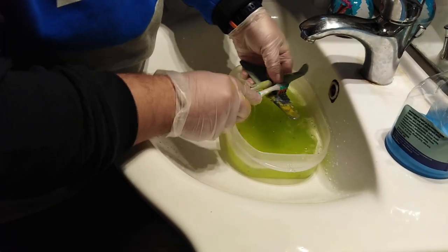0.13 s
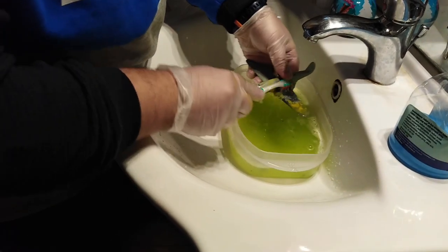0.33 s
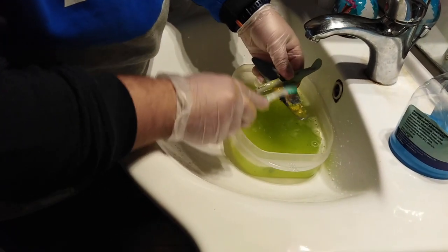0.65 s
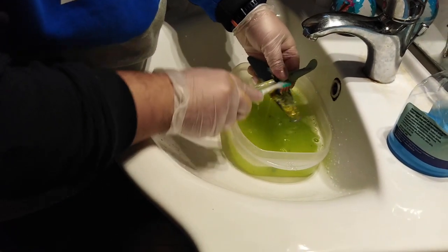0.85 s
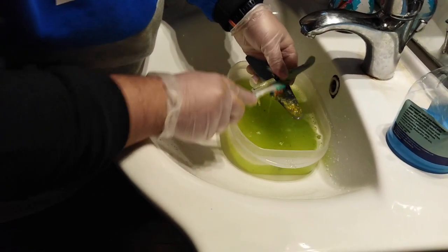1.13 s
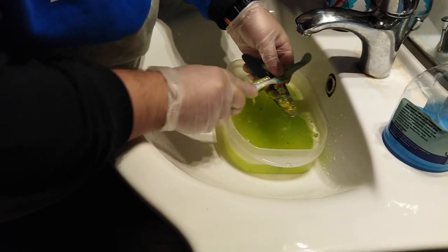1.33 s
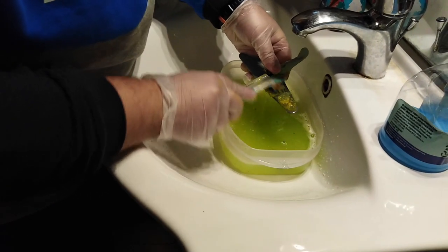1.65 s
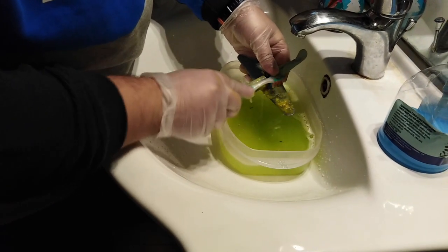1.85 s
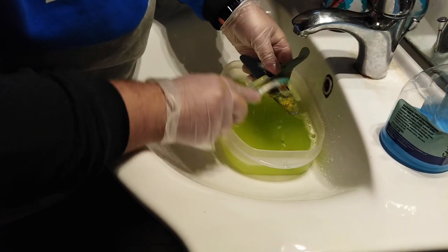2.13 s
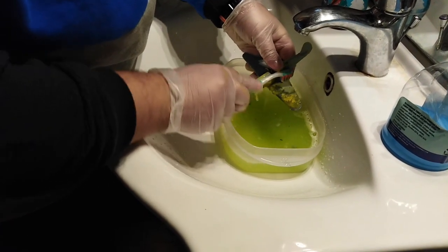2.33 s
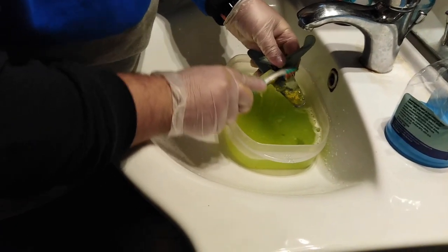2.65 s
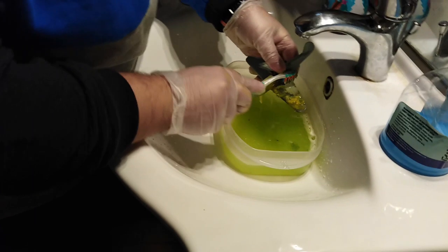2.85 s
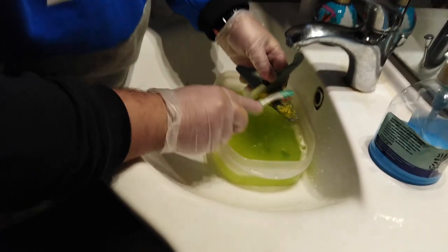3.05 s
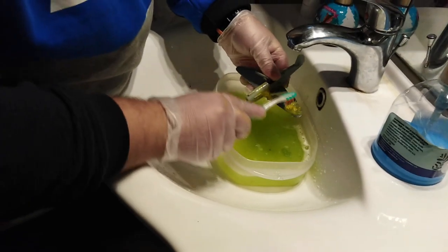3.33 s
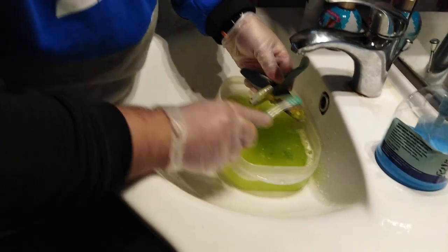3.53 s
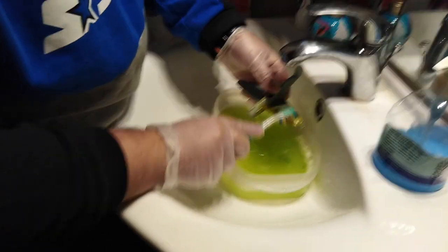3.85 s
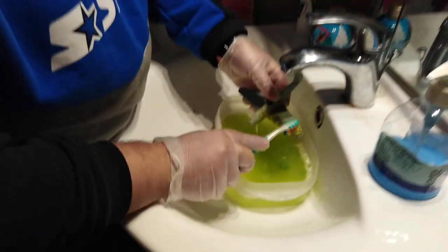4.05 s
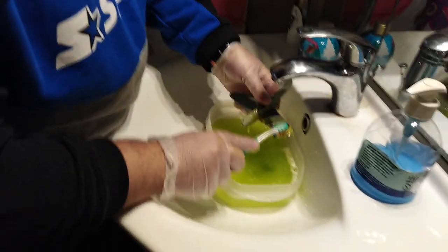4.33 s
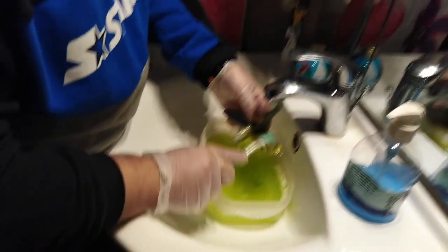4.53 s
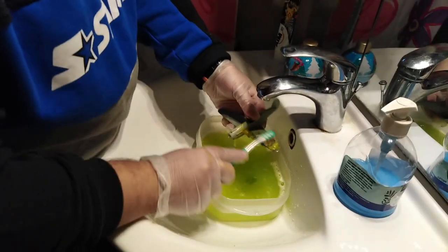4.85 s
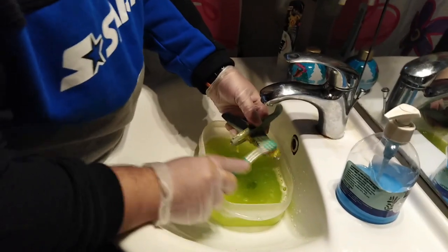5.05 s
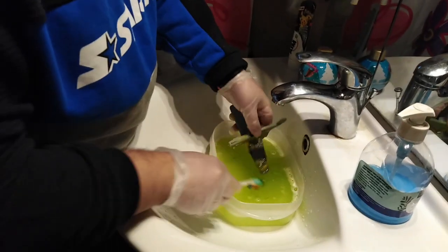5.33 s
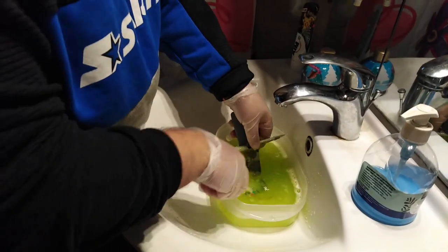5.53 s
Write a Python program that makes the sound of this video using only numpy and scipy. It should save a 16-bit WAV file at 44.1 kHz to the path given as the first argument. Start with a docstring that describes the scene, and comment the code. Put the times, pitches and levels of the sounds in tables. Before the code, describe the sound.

An old toothbrush scrubs a hard plastic part with quick, raspy back-and-forth strokes close up, then lifts away before a few scuffs and bumps.

```python
"""Toothbrush on a plastic part

At a sink, close to two microphones, a toothbrush scrubs a plastic part held over a plastic bowl.
The strokes are shaped noise of slipping bristle tips, coloured by the rings of the part.
Cracks ring the part, bumps ring the bowl, a glove groans as sine tones and a thin whistle glides down.
The brush lifts off and the part scuffs as it is put down; sparse echoes and a faint room surround it all."""
import sys
import numpy as np
from scipy import signal
from scipy.fft import rfft, irfft
from scipy.io import wavfile
from scipy.ndimage import uniform_filter1d

SR = 44100
rng = np.random.default_rng(int(sys.argv[2]) if len(sys.argv) > 2 else 0)


def materialize(psi):
    """Save the field psi as 16-bit PCM at rate SR to the path in sys.argv[1].

    A 1-D psi becomes a single channel; in a 2-D psi each row is a channel.
    """
    bounded = np.clip(np.atleast_2d(psi).T, -1, 1)
    quanta = np.round(bounded * 32767).astype(np.int16)
    wavfile.write(sys.argv[1], SR, quanta)


N = 251370


def gain_of(db):
    """Amplitude factor of a level in dB."""
    return 10 ** (np.asarray(db) / 20)


def evened(x):
    """Scale to an rms of 1."""
    return x / np.sqrt(np.mean(x ** 2) + 1e-20)


def read(points, hz):
    """Read a curve of (Hz, value) points on a logarithmic frequency axis."""
    f, value = np.transpose(points)
    return np.interp(np.log(hz + 1), np.log(f + 1), value)


def add(mix, s, sound):
    """Lay a sound into the mix at a time in seconds, cut at the end."""
    part = mix[round(s * SR):][:len(sound)]
    part += sound[:len(part)]


def ring(x, hz, width):
    """One decaying mode, a single resonance of peak gain near 1."""
    pole = np.exp((2j * np.pi * hz - np.pi * width) / SR)
    return 2 * signal.lfilter([1 - abs(pole)], [1, -pole], x).real


def ring_twice(x, hz, width):
    """A mode with steep flanks: a narrow resonance, then a wide one."""
    return ring(ring(x, hz, width), hz, 5.26 * width)


def wander(seconds):
    """Slow chance of rms 1: noise averaged twice over the given time."""
    size = max(round(seconds * SR), 1)
    return evened(uniform_filter1d(uniform_filter1d(rng.standard_normal(N), size=size), size=size))


def chance_map(shape, *smoothing):
    """Noise of rms 1 over a spectrogram, averaged along each given (axis, cells)."""
    noise = rng.standard_normal(shape)
    for axis, cells in smoothing:
        noise = uniform_filter1d(noise, size=cells, axis=axis)
    return evened(noise)


# The quiet room at the sink. Each row: frequency in Hz, relative density in dB per Hz.
ROOM_SPECTRUM = [(25, -10), (90, 7), (300, -3), (700, -4.5), (2500, -14.5), (7000, -30), (14300, -21)]
ROOM_DB = -80


def room():
    """Shaped noise makes the faint rumble and hiss, shared by both microphones in part, most in the bass."""
    hz = np.fft.rfftfreq(N, 1 / SR)
    a, b = rfft(rng.standard_normal((2, N)))
    same = np.clip(0.41 / (1 + (hz / 600) ** 2), 0, 1)
    both_sides = [a, same * a + np.sqrt(1 - same ** 2) * b]
    noise = irfft(gain_of(read(ROOM_SPECTRUM, hz)) * both_sides, N)
    return gain_of(ROOM_DB + 2.5 * wander(0.11)) * evened(noise)


# Brush strokes, push and pull in turn. Each row: turning point in seconds, relative level there in dB,
# rise in seconds, level of the bite in dB, level as the brush slows in dB.
STROKES = [(0.0, -47, 0.043, -30.5, -50), (.093, -57.5, 0.036, -45.5, -48),
           (0.263, -52.5, 0.029, -37.5, -44), (.321, -59, 0.059, -37, -45),
           (0.472, -55.5, 0.016, -50.5, -41.5), (0.585, -69, 0.037, -42.5, -40.5),
           (0.729, -47.5, 0.16, -36.5, -47), (0.96, -56.5, 0.022, -47, -46),
           (1.107, -76.5, 0.032, -30, -48), (1.233, -61.5, 0.024, -52, -41.5),
           (1.338, -63.5, 0.033, -38, -49), (1.476, -62.5, 0.015, -52.5, -42.5),
           (1.589, -64.5, 0.032, -36, -43), (1.718, -54, 0.01, -46.5, -40.5), (1.831, -60, 0.05, -33, -42),
           (1.965, -59.5, 0.013, -48, -41.5), (2.085, -71, 0.052, -36.5, -46.5),
           (2.243, -63, 0.022, -48, -42), (2.364, -63.5, 0.032, -45.5, -39),
           (2.493, -53.5, 0.087, -38, -57.5), (2.626, -63.5, 0.043, -39.5, -40.5),
           (2.763, -62, 0.033, -44, -45.5), (2.883, -54.5, 0.065, -36.5, -39),
           (3.05, -63, 0.036, -42.5, -39), (3.173, -60.5, 0.037, -31.5, -48.5),
           (3.327, -61, 0.036, -42, -42.5), (3.441, -58.5, 0.028, -34, -49),
           (3.568, -67.5, 0.031, -45, -43.5), (3.697, -61, 0.028, -37, -49.5),
           (3.83, -67, 0.029, -46.5, -45), (3.954, -60.5, 0.029, -40, -54), (4.077, -65, 0.039, -43.5, -42),
           (4.209, -61, 0.03, -40, -42), (4.33, -56, 0.037, -44.5, -41.5),
           (4.457, -53.5, 0.035, -37.5, -48.5), (4.594, -51.5, 0.039, -32, -37),
           (4.715, -59.5, 0.036, -40, -44.5), (4.873, -61.5, 0.043, -28.5, -43),
           (4.956, -43.5, 0.034, -39.5, -55)]
# How long before the turn the brush slows: push in seconds, pull in seconds.
SLOWING_S = [0.029, 0.042]
# The hiss dies away after the brush lifts. Each row: time in seconds, relative level in dB.
LIFT_TAIL = [(5.175, -73.5), (5.5, -85), (5.7, -100)]
# The part scuffs bowl and glove as it is put down. Each row: start in seconds, rise in seconds,
# relative peak level in dB, loss in dB per second.
SCUFFS = [(5.256, 0.019, -53.5, 300), (5.297, 0.003, -50, 258), (5.349, 0.017, -57.5, 201),
          (5.592, 0.0093, -34.5, 1800), (5.6, 0.0068, -48.5, 35)]
LIFT_S, SCUFF_RISE_DB = 5.015, 29.5
LOSE_S, LOSE_SHARE = 0.02, 0.45  # this share of the fall in dB to the turning point comes first, within this time


def contact():
    """Level of the rubbing: every stroke bends, bites, sweeps and slows; scuffs rise and die."""
    t = np.arange(N) / SR
    s, turn_db, rise, bite_db, slow_db = np.transpose(STROKES)
    ends = np.append(s[1:], LIFT_S)
    end_db = np.append(turn_db[1:], slow_db[-1])
    slows = np.maximum(ends - np.resize(SLOWING_S, len(s)), s + rise + 0.006)
    lost = np.minimum(slows + LOSE_S, (slows + ends) / 2)
    # the bristles bend over first, then let go at once
    bent_db = turn_db + 0.57 * (bite_db - turn_db)
    lost_db = slow_db + LOSE_SHARE * (end_db - slow_db)
    corners = np.ravel([s, s + 0.76 * rise, s + rise, slows, lost], "F")
    level_db = np.ravel([turn_db, bent_db, bite_db, slow_db, lost_db], "F")
    level = gain_of(np.interp(t, *np.hstack([[corners, level_db], np.transpose(LIFT_TAIL)])))
    for start, rise, db, loss_db in SCUFFS:
        since_peak = t - start - rise
        shape_db = np.minimum(SCUFF_RISE_DB * since_peak / rise, -loss_db * since_peak)
        level = level + (t > start) * gain_of(db + shape_db)
    return level


# How freely the held part rings. Each row: time in seconds, change in dB of the first, second and third
# ring of the part, change in dB of the fizz of the tips.
GRIP = [(0.05, -20, 11, -25, -6.5), (.2, -24, -8.5, -36, 2.5), (.46, 1, 5, -19, -5), (.6, 6, 6.5, -4, -0.5),
        (.8, -41, -2, -11.5, 3), (1.05, -55, -27, -2.5, -2), (1.15, 13, 2, 2.5, -1),
        (2.1, 9, 7.5, 2.5, 2.5), (2.7, 13, -1, -3, 0), (3.5, 28, 9, 4, 2.5), (3.9, 18.5, 1.5, 1, 0.5),
        (4.85, 14, -39, -3, -1.5), (5, 33.5, 10.5, -0.5, 0), (5.17, 0, -13, -2.5, -12),
        (5.28, 22, 18, 12.5, -0.5), (5.38, 38, 4, 5, -2.5), (5.6, -11, -1, 1, -4.5)]
# What the pull strokes add to the same four, in dB.
PULL_DB = [-2.4, 0.2, -1.5, 1.5]
# The part is turned and its fifth ring comes forward until the brush lifts.
# Each row: time in seconds, change of that ring in dB.
TURNED = [(3.6, 0.5), (4.0, 11), (5.0, 11), (5.1, 0)]
# Rings of the plastic part, for brush and ticks; the brush moves their centres with the hold.
# Each row: centre in Hz, width in Hz, relative density under the brush in dB per Hz.
PART = [(1250, 290, -26), (1868, 129, -5), (3170, 216, 6), (2540, 750, -6.5), (5594, 710, -5.5),
        (9360, 270, -9), (12960, 360, -9.5)]


def ring_levels(frames, stroke):
    """The hold damps or frees each ring of the part; gives rings and fizz in dB over time."""
    grip_s, *columns = np.transpose(GRIP)
    pull = (stroke % 2) * (stroke < len(STROKES))
    *rings_db, fizz_db = [np.interp(frames, grip_s, column) + pull_db * pull
                          for column, pull_db in zip(columns, PULL_DB)]
    rings_db += [0 * frames] * (len(PART) - len(rings_db))
    rings_db[4] = np.interp(frames, *np.transpose(TURNED))
    rings_db[3] = 0.25 * rings_db[2] + 0.27 * rings_db[4]  # follows both its neighbour and the turn
    return rings_db, fizz_db


# Scrape of the bristles without the rings. Each row: frequency in Hz, relative density in dB per Hz.
BRISTLES = [(500, -30.5), (1000, -33.5), (1600, -36.5), (2500, -8), (4200, 1.5), (6500, 0), (10000, -5),
            (14300, -9)]
# The third ring of the part moves with the hold. Each row: time in seconds, centre in Hz.
SLIDE = [(1.0, 3220), (1.7, 3314), (3.2, 3080), (4.7, 3180), (5.3, 3160)]


def brush_spectrum(hz, frames, stroke, strokes):
    """Power of the scrape over time: bristle hiss plus the rings of the held part."""
    rings_db, fizz_db = ring_levels(frames, stroke)
    # a light touch thins all below the hiss of the tips; the turn hollows the hiss under the fifth ring
    body_db = 0.41 * rings_db[2] / (1 + (hz / 4000) ** 8)
    body_db = body_db - 0.35 * rings_db[4] / (1 + ((hz - 4200) / 800) ** 4)
    tips_db = fizz_db / (1 + (7500 / (hz + 1)) ** 8)
    power = gain_of(2 * (read(BRISTLES, hz) + body_db + tips_db))
    # the fingers shift the rings from stroke to stroke
    shifts = 1 + 0.023 * rng.standard_normal((len(PART), strokes))[:, stroke]
    shifts[2] *= np.interp(frames, *np.transpose(SLIDE)) / PART[2][0]
    # the rings come and go
    at = np.arange(len(frames)) % (N // 128)
    rings_db = rings_db + 2.66 * np.array([wander(0.035)[::128][at] for _ in PART])
    for (centre, width, db), own_db, shift in zip(PART, rings_db, shifts):
        power = power + gain_of(2 * (db + own_db)) / (1 + (2 * (hz - centre * shift) / width) ** 4)
    return power / np.mean(power)


def brush():
    """Thousands of bristle slips a second, in clumps, are coloured by the part, each stroke on another spot."""
    strength = gain_of(3.6 * np.minimum(rng.exponential(1, N), 5.5))
    slips = strength * (rng.random(N) < 5000 / SR) * rng.choice([-1, 1], N)
    slips = evened(slips * gain_of(0.84 * wander(0.0087) + 0.5 * wander(0.0021)))
    hz, frames, z = signal.stft(slips * contact(), SR, nperseg=512, noverlap=384)
    starts = np.array([row[0] for row in STROKES + SCUFFS])
    stroke = np.clip(np.searchsorted(starts, frames) - 1, 0, None)
    hz = hz[:, None]
    power = brush_spectrum(hz, frames, stroke, len(starts))
    stereo = (2, len(hz), len(frames))
    # each spot sounds its own way to each microphone, partly alike
    spot = rng.standard_normal((2, len(hz), len(starts)))
    spot = evened(uniform_filter1d(spot + 0.5 * spot.mean(axis=0), size=7, axis=1))[:, :, stroke]
    patches = chance_map(stereo, (1, 10), (2, 8))
    # the colour of the scrape shifts within a stroke
    sweep = chance_map(stereo[1:], (0, 30), (1, 5))
    high = 1 / (1 + (4000 / (hz + 1)) ** 4)  # chance is stronger in the treble
    colour_db = 1.93 * spot + (0.57 + 2.1 * high) * patches + (1.55 + 0.63 * high) * sweep
    # tips all over the part reach the microphones by unequal paths
    paths = chance_map(stereo, (1, 6), (2, 6))
    z = z * np.exp(1.3j * paths * np.sqrt(hz / 10000))
    z = z * np.sqrt(power) * gain_of(colour_db)
    return signal.istft(z, SR, nperseg=512, noverlap=384)[1][:, :N]


# Bumps of hand, part or brush on the bowl. Each row: start in seconds, dry peak level in dB, centre in Hz,
# spread in octaves, decay time of the rub in seconds.
BUMPS = [(.392, -61.5, 710, 0.065, .012), (.511, -64, 343, 0.075, .002), (0.562, -54.5, 940, 0.093, 0.0025),
         (0.596, -32.5, 1880, 0.08, 0.0032), (0.614, -42.5, 2250, 0.1, 0.0045),
         (.609, -45.5, 474, 0.2, 0.036), (.636, -39, 940, 1.2, 0.034), (.668, -59.5, 199, .3, .02),
         (0.748, -57.5, 970, 0.061, 0.034), (1.056, -48.5, 990, 0.039, 0.0011),
         (1.562, -42, 570, 0.28, 0.017), (1.699, -50.5, 530, 0.31, 0.021), (2.29, -54.5, 510, 0.22, 0.0058),
         (2.342, -50.5, 557, 0.25, 0.012), (3.108, -56, 715, 0.08, 0.034), (3.402, -62, 292, .25, 0.0016),
         (3.475, -62, 714, 0.056, 0.044), (3.6, -41.5, 510, 0.42, 0.028), (4.168, -46.5, 193, 0.36, 0.03),
         (4.482, -49, 1250, 0.12, 0.018), (4.958, -50.5, 1250, 0.39, 0.026),
         (5.313, -38, 970, 0.044, 0.0088), (5.396, -30.5, 1230, 0.52, 0.00071),
         (5.393, -46.5, 198, .9, 0.0051), (5.4, -45, 113, .15, 0.048), (5.411, -39.5, 170, 0.64, 0.0025),
         (5.435, -44, 149, 0.52, .002), (5.431, -36.5, 1250, 0.52, 0.0026), (5.448, -44.5, 260, 1.4, .002),
         (5.456, -44.5, 191, 0.27, .002), (5.466, -44.5, 139, 0.55, 0.0015),
         (5.483, -47.5, 203, 1.57, 0.0015), (5.533, -51, 123, 0.37, .003), (5.59, -47, 260, 0.1, 0.0074),
         (5.615, -53.5, 256, 0.14, 0.021)]
# Modes of the bowl, in Hz.
BOWL_HZ = [113, 205, 270, 345, 400, 480, 715, 800, 870, 950, 1120, 1300, 1460, 1880, 2250]


def bumps():
    """A blow and a grainy rub ring the modes of the bowl that lie near its centre."""
    out, t = np.zeros(N), np.arange(12000) / SR
    # the knocks carry nothing below about 85 Hz
    no_bass = signal.butter(3, 85, "highpass", fs=SR, output="sos")
    for s, db, centre, spread, length in BUMPS:
        blow = 12 * np.exp(-length / 0.0033) * (t == 0)  # weaker in a long rub
        grains = rng.standard_normal(len(t)) ** 3 / 4
        rub = blow + grains * np.minimum(t / (0.31 * length), 1) * np.exp(-t / length)
        sound = 0
        for hz in BOWL_HZ:
            nearness = gain_of(-6 * (np.log2(hz / centre) / spread) ** 2)
            sound = sound + nearness * ring_twice(rub, hz, 30 + 0.06 * hz)  # higher modes die sooner
        sound = signal.sosfilt(no_bass, sound)
        add(out, s, gain_of(db) * sound / abs(sound).max())
    return out


# The brush head strikes an edge of the part. Each row: start in seconds, dry peak level in dB,
# centre in Hz, decay time in seconds.
TICKS = [(1.065, -36.5, 1750, 0.0028), (1.314, -33, 1370, 0.0036), (1.56, -35, 1900, 0.002),
         (1.798, -36, 1500, 0.0072), (2.276, -30.5, 3220, 0.0034), (4.177, -36.5, 1380, 0.0078),
         (4.629, -20, 4350, 0.0047), (4.91, -24, 3360, 0.012), (5.3007, -25.5, 3350, 0.004),
         (5.321, -36, 5200, 0.0018), (5.601, -27.5, 3450, 0.0057)]


def ticks():
    """A short crack rings the modes of the part that lie near its centre."""
    out, t = np.zeros(N), np.arange(3000) / SR
    for s, db, centre, length in TICKS:
        # one sharp blow, then a rattle
        crack = (0.64 * rng.standard_normal(len(t)) + 5 * (t == 0)) * np.exp(-t / length)
        sound = 0
        for hz, width, _ in PART:
            nearness = gain_of(-11 * np.log2(hz / centre) ** 2)
            sound = sound + nearness * ring_twice(crack, hz, 2 * width)
        low_cut = np.clip(0.5 * centre, 600, 2500)
        sound = signal.sosfilt(signal.butter(4, low_cut, "highpass", fs=SR, output="sos"), sound)
        add(out, s, gain_of(db) * sound / abs(sound).max())
    return out


def tone(rows, flutter_db):
    """A gliding sine whose level flutters by chance."""
    s, hz, db = np.transpose(rows)
    t = np.arange(N) / SR
    fade = np.interp(t, [s[0] - .01, s[0], s[-1], s[-1] + 0.028], [0, 1, 1, 0])
    wave = np.sqrt(2) * np.sin(2 * np.pi * np.cumsum(np.interp(t, s, hz)) / SR)
    return wave * fade * gain_of(np.interp(t, s, db) + flutter_db * wander(0.005))


# A glove slides on the bowl. Each row: time in seconds, pitch in Hz, dry rms level in dB before the flutter.
GROAN = [(2.885, 592, -69), (2.918, 606, -50), (2.95, 608, -47.5), (2.975, 597, -52), (3.01, 582, -73),
         (3.05, 612, -61.5), (3.085, 550, -73)]
# A second, higher line of the groan. Each row: time in seconds, pitch in Hz, level in dB likewise.
GROAN_HIGH = [(2.86, 720, -65), (2.915, 812, -61.5), (3.0, 754, -69)]


def groan():
    """The sliding glove groans on two unsteady sine lines."""
    return tone(GROAN, flutter_db=2.0) + tone(GROAN_HIGH, flutter_db=5.0)


# A thin whistle glides down. Each row: time in seconds, pitch in Hz, dry rms level in dB before the flutter.
WHISTLE = [(5.06, 7550, -74), (5.11, 7330, -69), (5.25, 6700, -80)]


def whistle():
    """A faint high sine glides down and fades."""
    return tone(WHISTLE, flutter_db=3.5)


# Echoes of the basin. Each row: frequency in Hz, time to fall by 60 dB in seconds,
# echo level in dB, to which each source adds its own wet level.
SINK = [(154, 0.42, 3), (426, 0.26, 1.5), (1500, 0.11, 5), (4080, 0.076, 3.5), (13000, 0.023, 4)]


def sink(x, wet_db):
    """Basin and tiles throw sparse echoes back, other ones to each microphone, each band dying at its own speed."""
    taps = np.zeros((2, SR // 2))
    # one echo at a chance place in every 20 samples
    at = np.arange(20, SR // 2 - 20, 20) + rng.integers(0, 20, (2, (SR // 2 - 21) // 20))
    np.put_along_axis(taps, at, rng.choice([-1., 1.], at.shape), 1)
    hz, t, z = signal.stft(taps, SR, nperseg=256)
    table = np.array(SINK)
    # the bass echoes reach both microphones alike
    alike = 1 / (1 + (hz[:, None] / 260) ** 2)
    z = np.array([z[0], alike * z[0] + np.sqrt(1 - alike ** 2) * z[1]])
    z = z * gain_of(-60 * t / read(table[:, :2], hz)[:, None])
    # the same energy in every band, before the echo level of each is set
    z = z / np.sqrt((abs(z) ** 2).sum(axis=2).mean(axis=0))[:, None]
    flat = np.linalg.norm(signal.istft(z, SR, nperseg=256)[1][0])
    echo_gain = gain_of(read(table[:, ::2], hz))[:, None]
    tail = signal.istft(z * echo_gain, SR, nperseg=256)[1] / flat
    echoes = signal.fftconvolve(x * np.ones((2, 1)), tail, axes=1)[:, :N]
    return x + gain_of(wet_db) * echoes


def scene():
    """Part, bowl and tones each ring in the sink, over the quiet room."""
    part = sink(brush(), wet_db=-6.5) + sink(ticks(), wet_db=-6.5)
    bowl = sink(bumps(), wet_db=-5.5)
    tones = sink(groan() + whistle(), wet_db=-10.5)
    return part + bowl + tones + room()


# Colour of the two microphones. Each row: frequency in Hz, level of left over right in dB.
LEFT_RIGHT = [(150, -1), (380, 2), (950, -1.5), (2380, -2.5), (5980, 4), (15000, -10.5)]
# Phase between the two microphones. Each row: frequency in Hz, lead of left over right in radians.
LEFT_LEADS = [(200, 0.33), (520, 1.5), (1900, 1.04), (3100, -0.67), (6370, -0.4), (7840, 3), (15200, 11)]
ROLL_HZ, EDGE_HZ = 14300, 15600


def record(dry):
    """Each microphone has its own colour and phase; the treble rolls off, then the band limit."""
    hz = np.fft.rfftfreq(N, 1 / SR)
    side = np.array([[.5], [-.5]])  # each microphone takes half the difference
    colour = gain_of(side * read(LEFT_RIGHT, hz)) * np.exp(1j * side * read(LEFT_LEADS, hz))
    coloured = irfft(rfft(dry) * colour, N)
    roll = signal.firwin(401, ROLL_HZ, window=("kaiser", 4), fs=SR)
    edge = signal.firwin(255, EDGE_HZ, window=("kaiser", 9), fs=SR)
    rolled = signal.oaconvolve(coloured, roll[None], "same")
    return signal.oaconvolve(rolled, edge[None], "same")


dry = scene()
out = record(dry)
materialize(out)
```